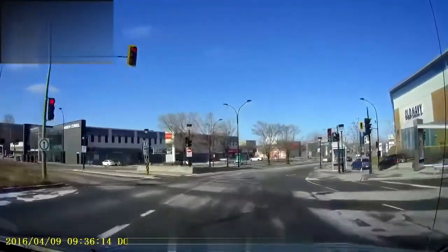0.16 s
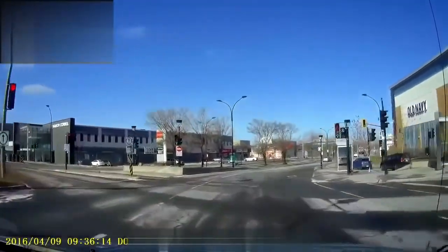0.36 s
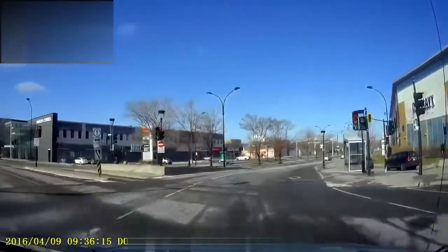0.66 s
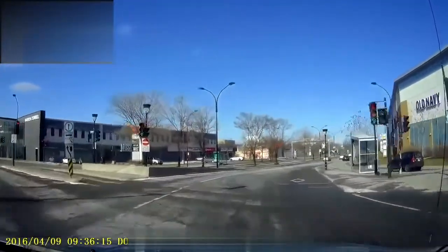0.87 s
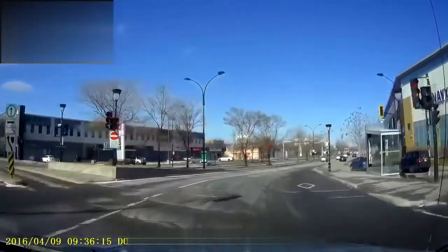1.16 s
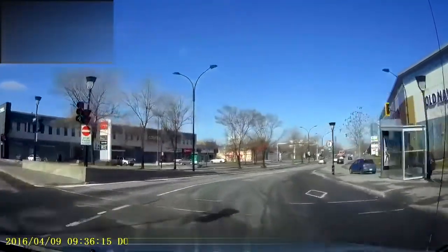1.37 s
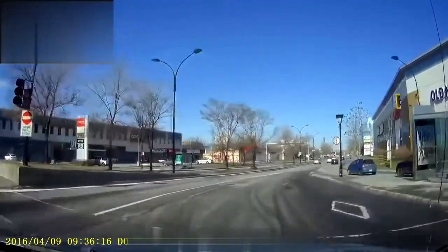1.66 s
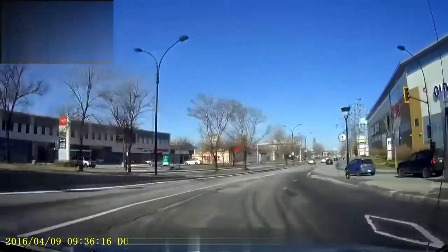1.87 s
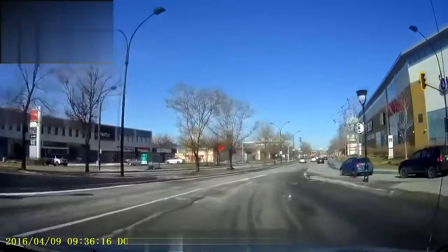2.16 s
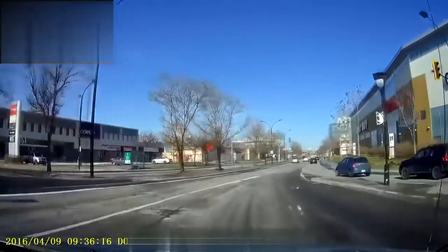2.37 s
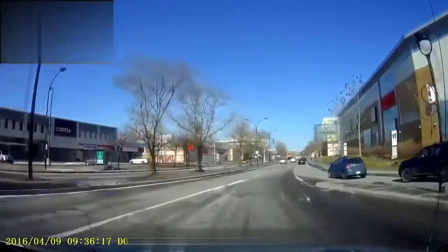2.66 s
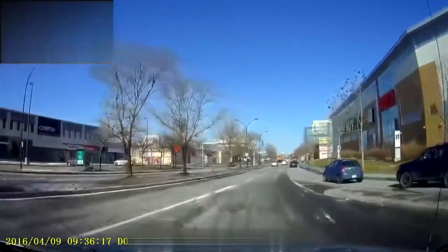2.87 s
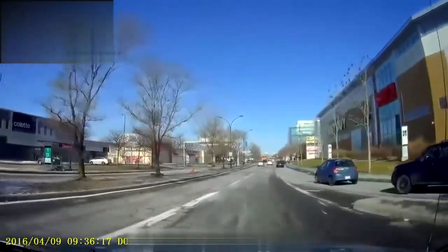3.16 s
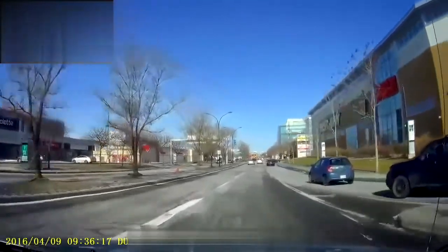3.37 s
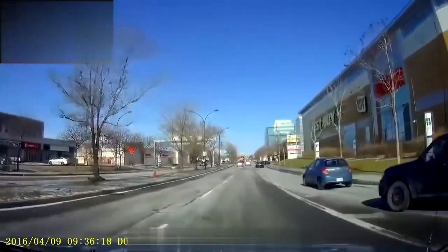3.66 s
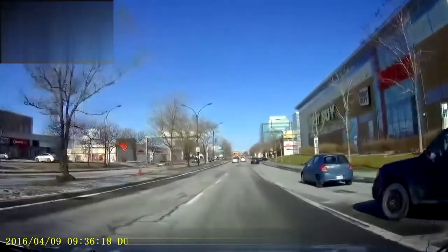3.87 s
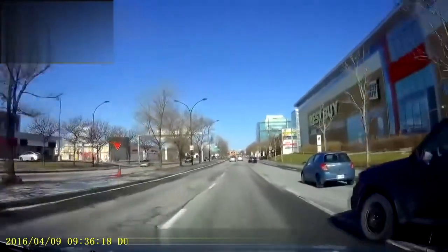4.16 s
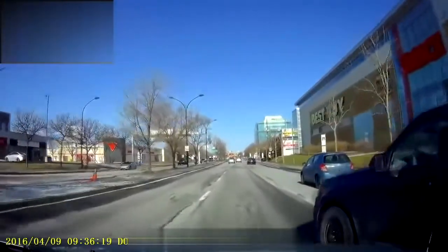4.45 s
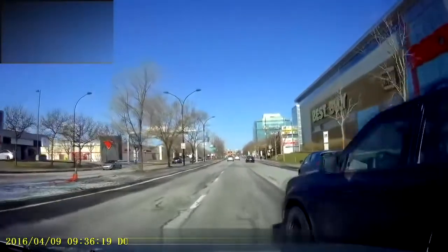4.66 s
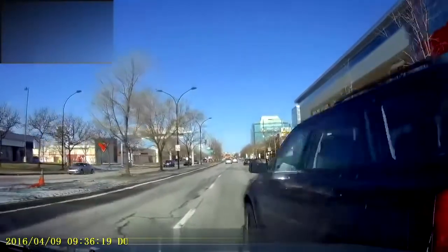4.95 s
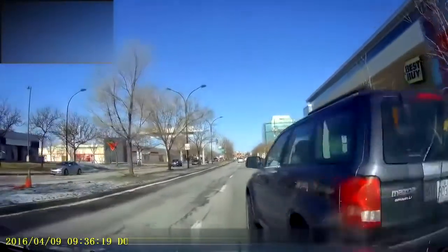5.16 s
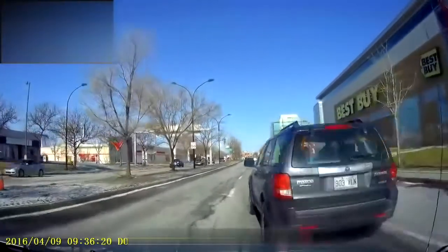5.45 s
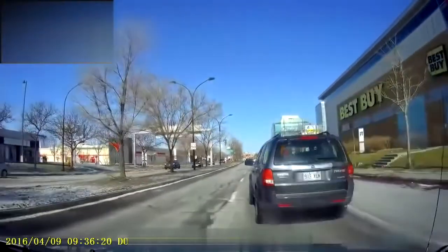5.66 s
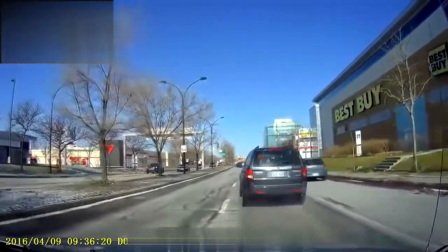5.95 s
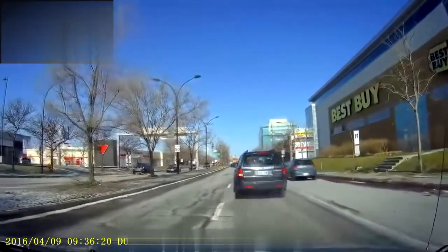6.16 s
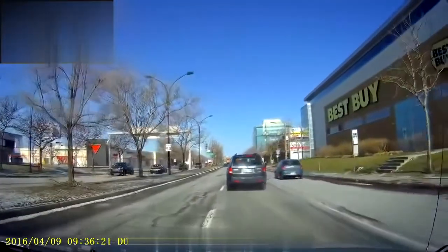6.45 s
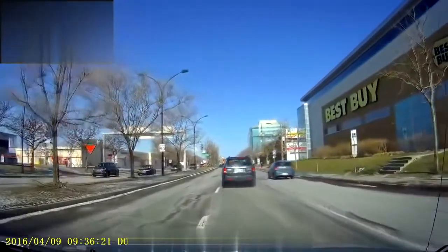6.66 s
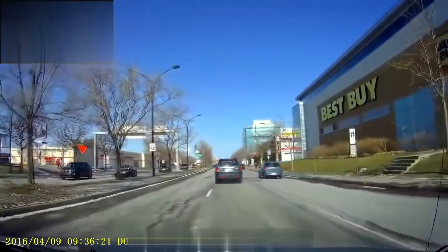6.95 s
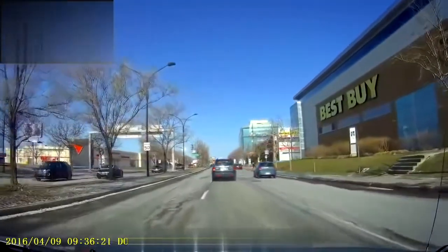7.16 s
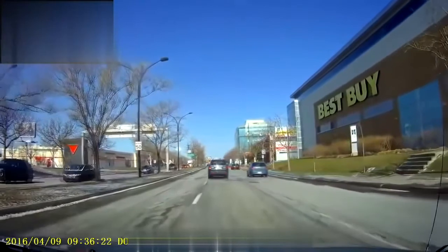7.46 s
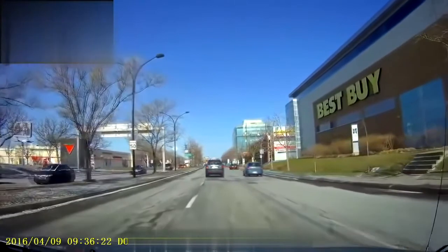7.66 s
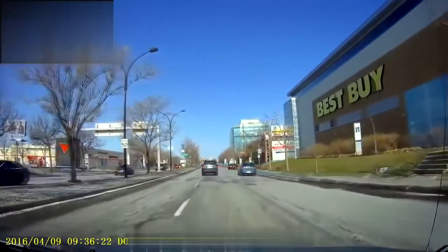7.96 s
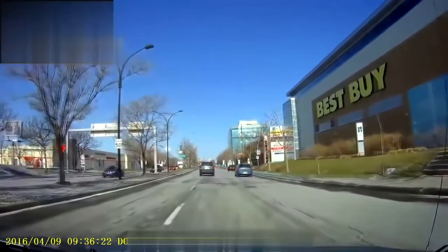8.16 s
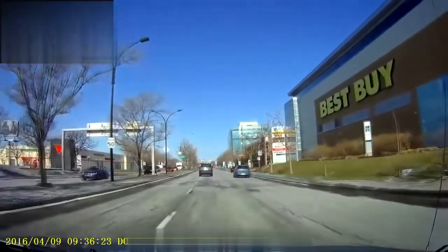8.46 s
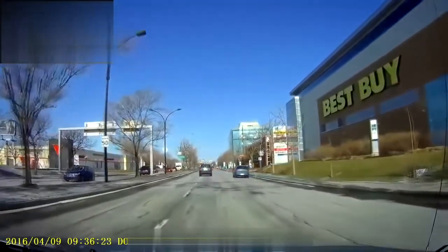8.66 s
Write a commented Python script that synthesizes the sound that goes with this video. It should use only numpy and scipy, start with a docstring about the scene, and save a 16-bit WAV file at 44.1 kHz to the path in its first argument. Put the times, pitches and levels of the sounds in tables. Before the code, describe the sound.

Low tyre rumble and engine drone fill a car cabin, heard in mono from a small dashboard microphone, with faint vent air beneath. A soft bump comes at 0.6 seconds and a dry plastic clack at 2.2, after which the engine eases off. At 3.8 seconds a hand slaps the wheel with a slight clothing rustle, and a loud, brassy horn starts on one steady mid-pitched note. Just after 5 seconds a heavy jolt, the loudest moment, shakes the cabin: panels boom, plastic trim chatters and a small metal piece tinkles faintly. The horn dips for an instant, then returns at full strength while smaller thuds follow until about 5.8. It cuts off at 6.8 seconds, leaving quieter coasting noise. Around 8 seconds the car thumps over a road joint and the engine pulls again, rising slightly in pitch, with a small plastic click at 8.6.

```python
"""Tyre rumble and engine drone, heard inside a car on a city road from a small dashboard microphone. An arm's
length away a hand slaps the wheel, and the buzzing diaphragm of one horn blares for three seconds. Midway a
heavy jolt shakes the cabin: panels boom, loose things rattle, the horn dips briefly. The car coasts, thumps
over a road joint and pulls away again; clothing rustles and vents blow faintly."""
import sys
import numpy as np
from scipy import signal
from scipy.fft import rfft, irfft, next_fast_len
from scipy.io import wavfile
from scipy.ndimage import uniform_filter1d

SR = 44100
rng = np.random.default_rng(int(sys.argv[2]) if len(sys.argv) > 2 else 0)


def log_audio(samples):
    """Write samples as a 16-bit WAV file to the path given in sys.argv[1]."""
    # one column per channel
    frames = np.atleast_2d(samples).T
    # limit to full scale, then quantise
    limited = np.clip(frames, -1, 1)
    pcm = np.round(limited * 32767).astype(np.int16)
    wavfile.write(sys.argv[1], SR, pcm)


N = 388521
T = np.arange(N) / SR

# tyre noise as the car cruises, slows and picks up again: (time [s], rumble [dB], roar [dB])
TYRE_LEVELS = [(0, -34.5, -39), (.7, -31.5, -37.5), (2.8, -35.5, -37.5), (3.7, -32, -38), (4.5, -34, -33.5),
               (5.55, -33.5, -36), (6.15, -39.5, -43.5), (7.35, -42, -45.5), (7.8, -41.5, -50),
               (8.55, -38.5, -41)]
# colour of tyre hiss and of rustling cloth: (frequency [Hz], level [dB])
HISS_COLOUR = [(2000, 11), (3300, 0.5), (5300, -0.5), (7500, -6), (12000, -7), (15500, -9)]
PRESS_S, JOLT_S, LET_GO_S = 3.792, 5.07, 6.812  # the course of the horn blast


def horn(pitch_hz=409.4, sag_hz_per_s=.22, scoop_hz=25.9, level_db=-23.5, duck_db=-14.5):
    """The horn scoops up to pitch and sags slowly; its level at the microphone ducks at the jolt."""
    hz = pitch_hz - sag_hz_per_s * np.maximum(T - PRESS_S, 0) - scoop_hz * fade(PRESS_S, 0.01615)
    wobble_hz = .35 * walk(16) + 1.05 * walk(300)
    phase = 2 * np.pi * np.cumsum(hz + wobble_hz) / SR
    recovery = ramp(JOLT_S + 0.15, 0.17)
    duck = undb(duck_db * (ramp(JOLT_S, 0.015) - recovery))
    gain = ramp(PRESS_S, 0.035) * duck
    tone = undb(level_db) * horn_partials(phase, recovery) * fade(LET_GO_S, 0.012)
    haze = horn_haze(phase) * fade(LET_GO_S, 0.054)
    return gain * (tone + haze) + horn_buzz(phase) + horn_release()


def horn_partials(phase, recovery, waver_db=0.67, flutter=0.076):
    """The horn is strong in odd partials; each wavers on its way through the shaking body."""
    # (multiple of the pitch, level before the jolt [dB], level after it [dB])
    partials = [(1, -0.6, -0.3), (2, -7.2, -11), (3, 0.5, -1.3), (4, -22.5, -26), (5, -9.5, -8.5),
                (6, -21.5, -34), (7, -18.5, -26.5), (8, -38, -38.5), (9, -46, -41), (10, -54, -50),
                (12, -45, -49.5)]
    out = np.zeros(N)
    for order, before_db, after_db in partials:
        db = before_db + recovery * (after_db - before_db) + waver_db * np.sqrt(order) * walk(6)
        if order == 5:  # the brassy fifth wanes and flutters until the jolt
            db += (-5.5 + 2.6 * walk(90)) * ramp(4.07, .25) * (1 - recovery)
        # more flutter early in the blast, and more in the high partials
        shake = 1 + flutter * np.sqrt(order) * (1 - recovery / 2) * walk(45)
        out += np.sqrt(2) * undb(db) * shake * np.sin(order * phase + rng.uniform(0, 2 * np.pi))
    return out


def horn_buzz(phase, start_s=5.33, length_s=0.4, level_db=-43):
    """The sixth partial buzzes for a moment after the jolt."""
    envelope = ramp(start_s, .05) * fade(start_s + length_s, 0.034) * (1 + 0.26 * walk(90))
    return np.sqrt(2) * undb(level_db) * envelope * np.sin(6 * phase)


def horn_release(peak_s=6.838, peak_db=-24, hz=805, ring_s=0.016):
    """As the drive stops, the air column sounds at its own pitch, just under the second partial."""
    return undb(peak_db) * np.exp(-abs(T - peak_s) / ring_s) * np.sin(2 * np.pi * hz * T)


def horn_haze(phase, level_db=-32, grit=0.42, roar_share=0.58):
    """The horn's gritty haze of noise pulses with its tone and partly follows the tyre roar."""
    # colour of the haze: (frequency [Hz], level [dB])
    colour = [(250, -14), (440, -1), (495, 3.5), (560, -0.5), (610, -0.5), (690, -3), (930, -6),
              (1150, 5.5), (1330, -3.5), (1500, -14.5), (1750, -7.5), (2130, -1.5), (2400, -6.5),
              (2850, -9.5), (3400, -27.5), (6000, -33), (14000, -58.5)]
    _, roar_db = curves(TYRE_LEVELS)
    haze = unit(noise(colour) * (1 + grit * np.cos(phase)))
    return haze * undb(level_db + roar_share * (roar_db - roar_db.max()))


def body_thumps():
    """Blows on the car body thud all around the microphone; the heaviest is the jolt."""
    # blows: (time [s], level [dB], contact [s], treble tilt [dB per octave])
    thumps = [(.62, -29, .03, -3.5), (2.188, -34, 0.025, -5), (3.78, -25.5, 0.018, -3),
              (4.13, -28, 0.073, 1), (5.03, -26, .01, 3), (5.041, -16.5, 0.021, 1.5),
              (5.063, -6, 0.012, 2.5), (5.105, -19, 0.04, 1.5), (5.15, -17.5, 0.052, -2.5),
              (5.525, -26.5, 0.079, -2), (5.73, -30.5, 0.041, -0.5), (8.052, -31.5, 0.045, -1.5)]
    # colour of the body: (frequency [Hz], level [dB])
    colour = [(25, -11), (60, -1.5), (130, -4), (330, 0), (500, -2.5), (900, -9), (1500, -20), (2600, -20),
              (4000, -38), (8000, -54.5), (15000, -61.5)]
    return blows(thumps, colour, rise_s=0.0013, ring_s=0.024)


def trim_knocks():
    """Short, dry knocks on the plastic trim near the microphone."""
    # knocks: (time [s], level [dB], contact [s], treble tilt [dB per octave])
    knocks = [(.638, -53, .012, 3.5), (2.212, -22, 0.003, -9), (3.659, -29, 0.0039, -4),
              (3.768, -25, 0.0048, 2.5), (3.776, -17.5, 0.015, 4), (3.838, -25, .003, 2),
              (3.85, -32, 0.0074, 3), (4.014, -25.5, 0.0054, -.5), (5.052, -28, .001, 13),
              (5.073, -12, 0.00085, 11), (5.123, -25.5, .016, -1), (5.196, -27, 0.0028, 2.5),
              (5.218, -27, 0.0018, .5), (5.4, -30.5, 0.0047, 2.5), (5.521, -43, 0.0027, 18),
              (6.835, -50.5, 0.0093, 8), (6.86, -55, .01, 6), (7.247, -39, .008, -1.5),
              (8.047, -35, 0.029, 1.5), (8.549, -40, 0.0087, -1), (8.581, -27.5, 0.0058, 1)]
    # colour of the trim: (frequency [Hz], level [dB])
    colour = [(120, -33), (200, -4.5), (630, 4.5), (769, 4.5), (1330, -13.5), (2380, -5.5), (2560, -9),
              (3360, -20), (4260, -18.5), (5200, -20), (5910, -21), (8200, -34), (13200, -43.5),
              (15500, -49)]
    return blows(knocks, colour, rise_s=0.00044, ring_s=0.0064)


def panel_booms(decay_at_100_hz_s=0.043, damping=0.32):
    """Springs and panels swing after a blow; the higher ones die sooner."""
    # swings: (time [s], level [dB], frequency [Hz])
    booms = [(.66, -19.5, 32.5), (2.19, -22.5, 48.45), (3.776, -16.5, 717), (3.795, -22.5, 141.7),
             (4.14, -16.5, 35), (5.044, -14.5, 239), (5.075, -12.5, 124), (5.141, -15, 35.5),
             (5.15, -9.5, 234), (5.25, -21, 239), (5.549, -16, 122.3), (5.731, -22, 510),
             (5.76, -22.5, 37.8), (7.52, -31.5, 262), (7.651, -24, 32.3), (8.052, -21, 87), (8.06, -24, 40)]
    out, t = np.zeros(N), T[:SR // 2]
    for s, db, hz in booms:
        decay_s = decay_at_100_hz_s * (hz / 100) ** -damping
        envelope = np.exp(-t / decay_s) * (1 - np.exp(-2 * hz * t))
        add(out, s, undb(db) * envelope * np.sin(2 * np.pi * hz * t))
    return out


def plastic_clacks():
    """A hard plastic part is struck close by and rings very briefly."""
    # strikes: (time [s], level [dB])
    clacks = [(2.213, -23.5), (8.581, -33)]
    # modes of the part: (frequency [Hz], level [dB], decay [s])
    modes = [(1076, 0.5, 0.0053), (1680, -4, .0036), (2840, -15, 0.0041)]
    return strikes(clacks, modes)


def metal_jingle():
    """A small loose metal piece tinkles, buzzing against its seat."""
    # strikes: (time [s], level [dB])
    jingles = [(5.402, -38.5), (5.531, -48)]
    # modes of the piece: (frequency [Hz], level [dB], decay [s])
    modes = [(6340, -18, .008), (9950, 5, 0.012), (13250, -4, .016), (14050, -6, .01), (15300, -6, .014)]
    return strikes(jingles, modes) * walk(400)


def trim_chatter(ticks_per_s=280, decay_s=0.0012):
    """Small plastic parts tick against each other after the jolt."""
    # spells of shaking: (start [s], end [s], level [dB])
    spells = [(5.064, 5.288, -51), (5.512, 5.62, -49)]
    # colour of a tick: (frequency [Hz], level [dB])
    colour = [(2000, 1), (4000, -1), (8000, 3), (13500, -7), (15500, -4)]
    shaking = sum(undb(db) * ((T > start) & (T < end)) for start, end, db in spells)
    ticks = (rng.random(N) < ticks_per_s / SR) * rng.uniform(0, 1.85, N)
    envelope = signal.lfilter([1], [1, -np.exp(-1 / (decay_s * SR))], ticks)
    return shaking * envelope * noise(colour)


def tyres(flutter_db=1.0, hiss_db=-65):
    """Below the cabin, tyres shake the body, roar through the floor and hiss on the asphalt."""
    # colours as heard in the cabin: (frequency [Hz], level [dB])
    rumble_colour = [(18, -8.5), (33, 4), (55, -2.5), (78, -3.5), (103, 0), (140, -2), (175, -8.5),
                     (210, -16.5)]
    roar_colour = [(120, -28.5), (200, -10.5), (235, 2), (320, -0.5), (370, 3), (435, -7.5), (490, -3),
                   (600, -6), (820, -8.5), (1080, -7), (1400, -21.5), (2000, -19.5), (2800, -28),
                   (3500, -54.5)]
    rumble_db, roar_db = curves(TYRE_LEVELS)
    surface_db = flutter_db * walk(14)
    hiss = noise(HISS_COLOUR) * undb(hiss_db)
    rumble = noise(rumble_colour) * undb(rumble_db + surface_db)
    roar = noise(roar_colour) * undb(roar_db + 0.73 * surface_db)
    return rumble + roar + hiss


def engine(cruise_db=-38.5, lift_off_s=2.45, coast_db_per_s=6, pull_s=8.08, pull_db=-37.5):
    """From up front, firing orders boom and the intake gasps once a firing; both follow the throttle."""
    # engine speed: (time [s], firing rate [Hz])
    speed = [(0, 64.37), (.6, 66.86), (1.3, 59.96), (3.6, 59), (6.5, 52), (8.16, 70.4), (8.81, 76.95)]
    # engine orders: (multiple of the firing rate, level [dB])
    orders = [(1, -6.5), (2, -2), (3, -14), (4, -8), (5, -13), (6, -9.5), (7, -13), (8, -14)]
    # colour of the intake: (frequency [Hz], level [dB])
    intake_colour = [(170, -6), (280, 6.5), (380, -5.5), (470, -14), (560, -1.5), (750, -6), (1100, -17.5),
                     (1400, -28.5), (2100, -15.5), (3300, -33), (5200, -32), (7000, -45)]
    firing_hz, = curves(speed)
    cruise = undb(cruise_db - coast_db_per_s * np.maximum(T - lift_off_s, 0))
    pull = undb(pull_db) * ramp(pull_s, .12)
    intake_cruise = cruise * undb(-19.5)  # well under the drone on a light throttle
    intake_pull = undb(pull_db) * (1 - fade(pull_s, 0.18)) * fade(8.59, 0.054)
    unsteady_hz = firing_hz * (1 + 0.00768 * walk(25))
    phase = 2 * np.pi * np.cumsum(unsteady_hz) / SR
    drone = sum(undb(db + 1.5 * walk(14)) * np.sin(order * phase + rng.uniform(0, 2 * np.pi))
                for order, db in orders)
    intake = noise(intake_colour) * (1 + 0.25 * np.cos(phase))
    return unit(drone) * (cruise + pull) + unit(intake) * (intake_cruise + intake_pull)


def clothing():
    """Soft rustles of the driver's clothing, close to the microphone."""
    # rustles: (time [s], peak [dB], half length [s])
    rustles = [(1.58, -65, .07), (3.785, -49.5, 0.16), (4.1, -58, 0.33), (5.4, -59.5, .3),
               (6.529, -57.5, 0.19), (7.103, -62.5, 0.39), (8.49, -63, .1)]
    power = sum(undb(db) ** 2 * np.exp(-2 * ((T - s) / half) ** 2) for s, db, half in rustles)
    return noise(HISS_COLOUR) * np.sqrt(power)


def blower(level_db=-60):
    """Air rushes faintly and steadily from the dashboard vents."""
    # colour of the air: (frequency [Hz], level [dB])
    colour = [(500, -1.5), (1000, 3.5), (1600, -10.5), (2050, -5.5), (2450, 3.5), (2950, -3.5), (3400, -13)]
    return noise(colour) * undb(level_db)


def blows(table, colour, rise_s, ring_s):
    """Each blow shakes a damped part while the contact lasts; longer pushes linger longer."""
    out, t = np.zeros(N), T[:SR // 2]
    for s, db, contact_s, tilt_db in table:
        attack = 1 - np.exp(-t / rise_s)
        tail = np.exp(-np.maximum(t - contact_s, 0) / np.sqrt(contact_s * ring_s))
        add(out, s, undb(db) * attack * tail * noise(colour, tilt_db, size=len(t)))
    return out


def strikes(table, modes):
    """Each strike rings the same modes."""
    out, t = np.zeros(N), T[:SR // 2]
    ring = sum(undb(db) * np.sin(2 * np.pi * hz * t) * np.exp(-t / decay) for hz, db, decay in modes)
    for s, db in table:
        add(out, s, undb(db) * ring)
    return out


def noise(colour, tilt_db=0, size=N):
    """Noise of rms 1 in the given colour, tilted per octave and falling steeply past both ends."""
    length = next_fast_len(size)
    octave = np.log2(np.maximum(np.fft.rfftfreq(length, 1 / SR), 1))
    hz, db = np.transpose(colour)
    inside = np.clip(octave, np.log2(hz[0]), np.log2(hz[-1]))
    gain = undb(np.interp(inside, np.log2(hz), db) + tilt_db * inside - 30 * abs(octave - inside))
    return unit(irfft(rfft(rng.standard_normal(length)) * gain, length)[:size])


def walk(rate_hz):
    """Smooth random wandering of rms 1."""
    hold = max(int(SR / rate_hz), 1)
    steps = np.repeat(rng.standard_normal(N // hold + 1), hold)
    return unit(uniform_filter1d(uniform_filter1d(steps, hold), hold)[:N])


def curves(table):
    """Each column after the time as a control signal."""
    s, *columns = np.transpose(table)
    return [np.interp(T, s, column) for column in columns]


def ramp(start_s, length_s):
    """Rises from 0 to 1, then holds."""
    return np.clip((T - start_s) / length_s, 0, 1)


def fade(start_s, decay_s):
    """Holds at 1, then dies away."""
    return np.exp(-np.maximum(T - start_s, 0) / decay_s)


def add(out, s, x):
    """Mix a short sound in at time s."""
    i = int(s * SR)
    out[i:i + len(x)] += x[:len(out) - i]


def undb(db):
    """Decibels to gain."""
    return 10 ** (np.asarray(db) / 20)


def unit(x):
    """Scale to rms 1."""
    return x / np.sqrt(np.mean(x ** 2))


def scene():
    """The cabin in mono, from just behind the windscreen."""
    impacts = body_thumps() + trim_knocks() + panel_booms()
    rattles = plastic_clacks() + metal_jingle() + trim_chatter()
    driving = tyres() + blower() + engine()
    return (horn() + impacts + rattles + driving + clothing())[None]


def record(dry, whine_hz=9518, whine_db=-75.5, ceiling=0.53, top_hz=15550):
    """The microphone's electronics add a faint whine, flatten the loudest peaks and cut the top."""
    x = dry + np.sqrt(2) * undb(whine_db) * np.sin(2 * np.pi * whine_hz * T)
    limited = x / (1 + (x / ceiling) ** 6) ** (1 / 6)
    return signal.sosfilt(signal.ellip(10, .2, 80, top_hz, fs=SR, output="sos"), limited)


dry = scene()
out = record(dry)
log_audio(out)
```